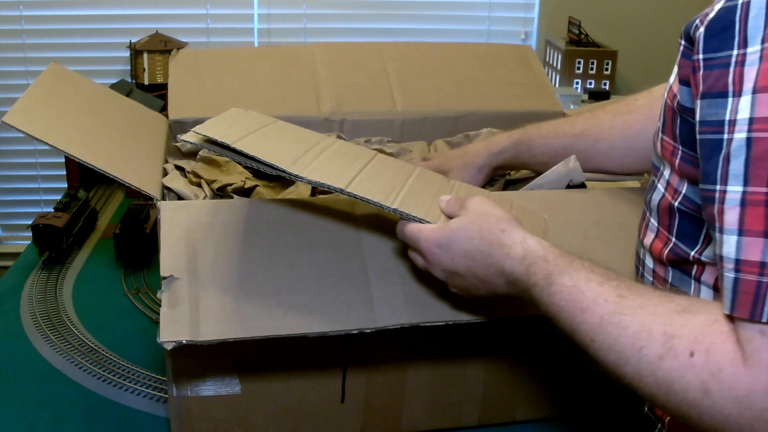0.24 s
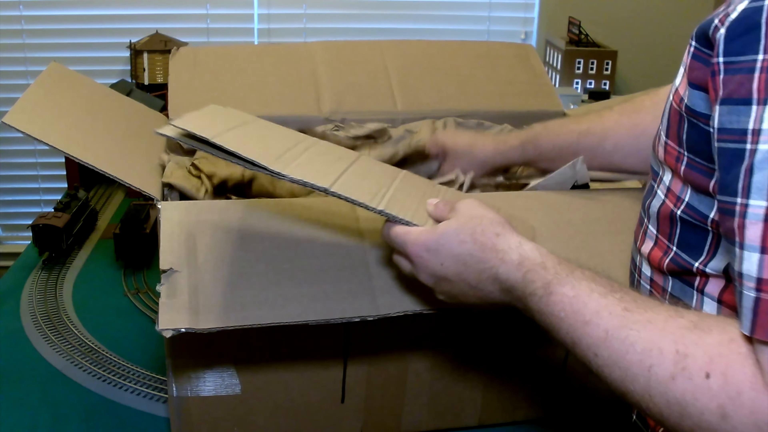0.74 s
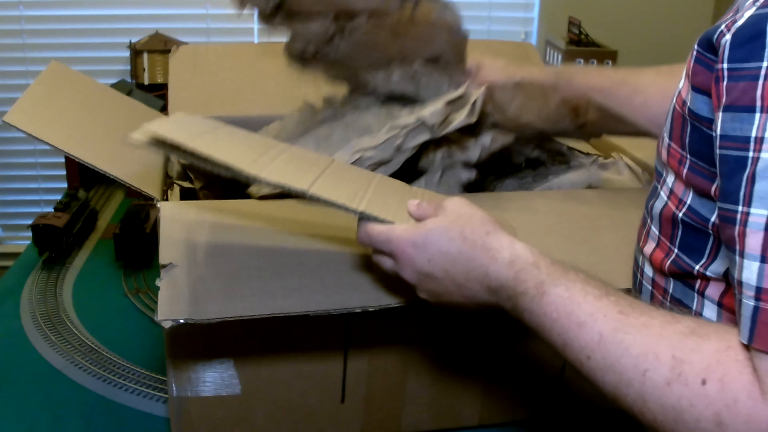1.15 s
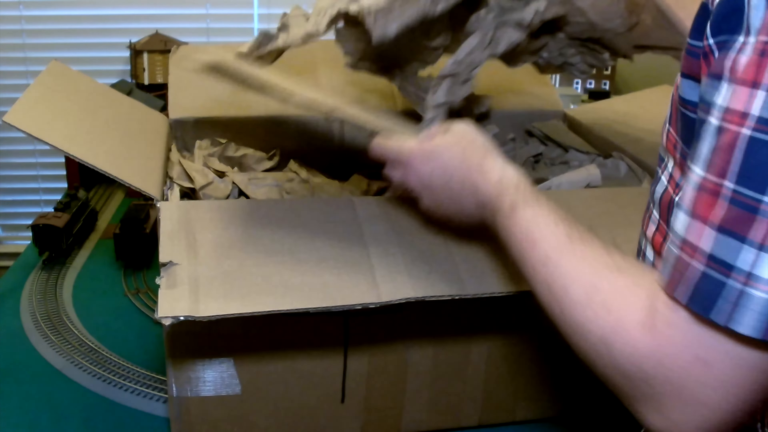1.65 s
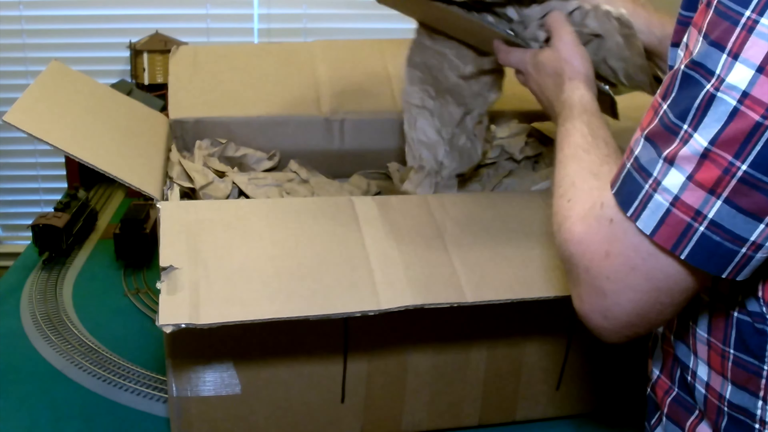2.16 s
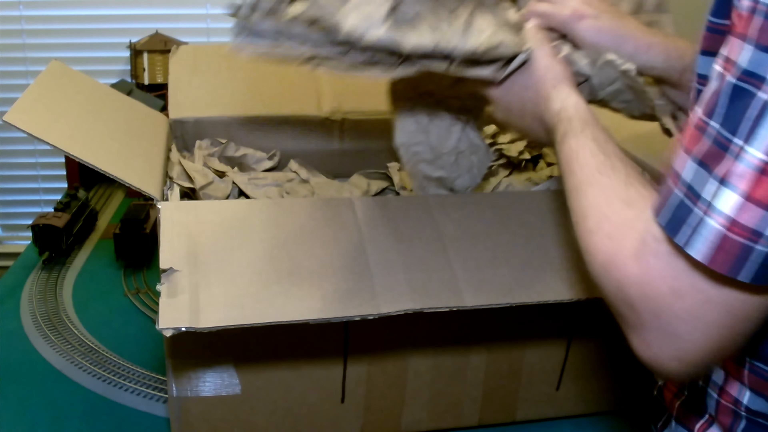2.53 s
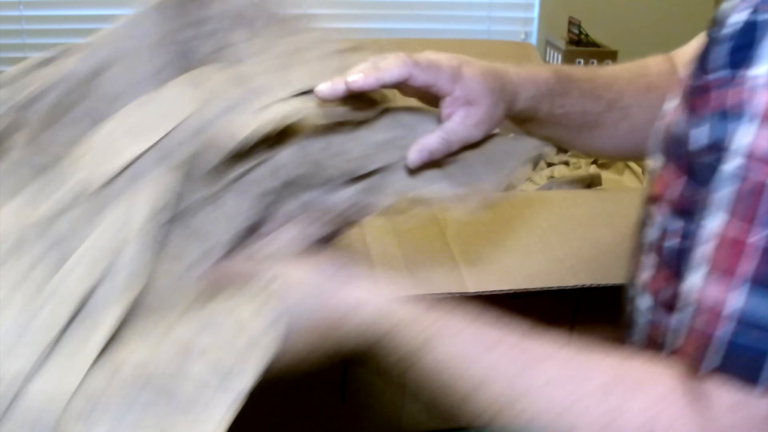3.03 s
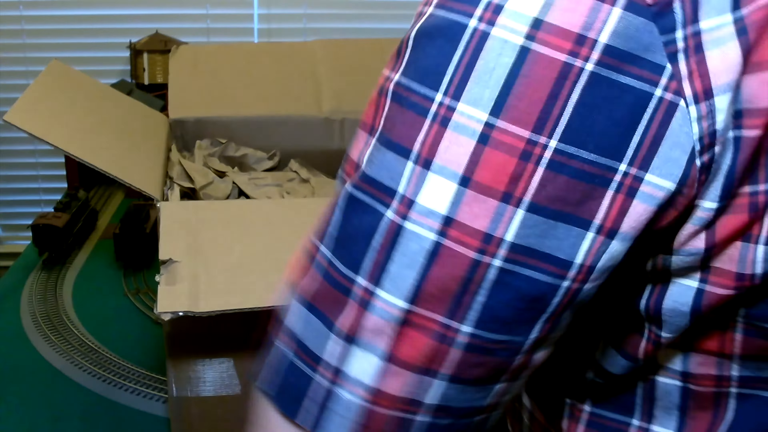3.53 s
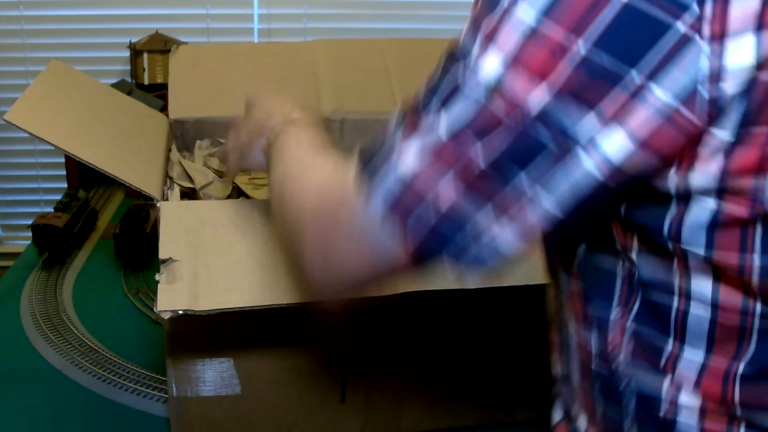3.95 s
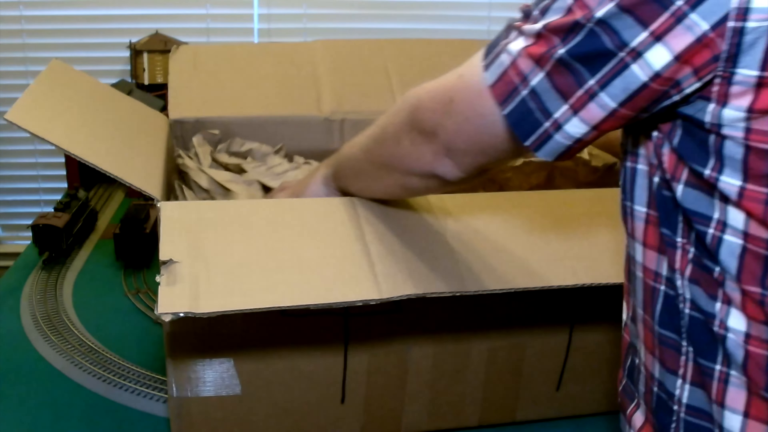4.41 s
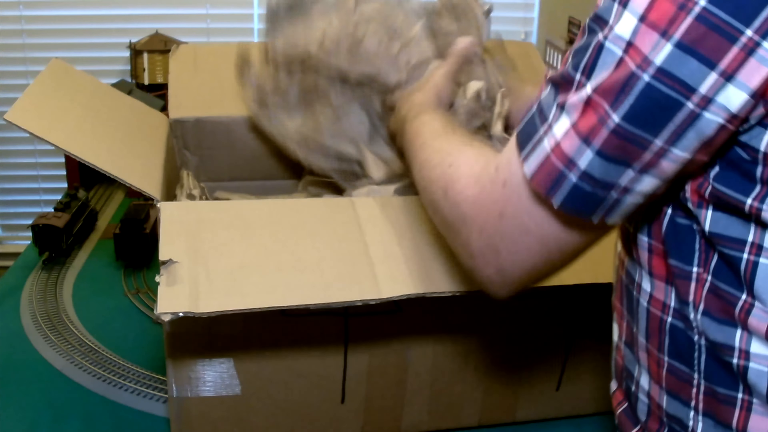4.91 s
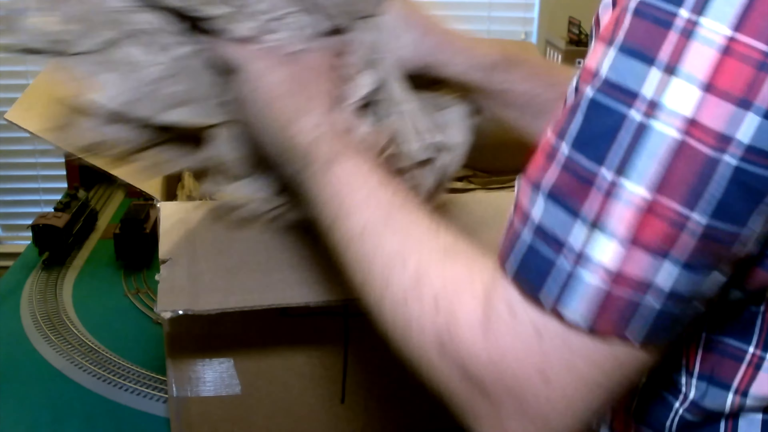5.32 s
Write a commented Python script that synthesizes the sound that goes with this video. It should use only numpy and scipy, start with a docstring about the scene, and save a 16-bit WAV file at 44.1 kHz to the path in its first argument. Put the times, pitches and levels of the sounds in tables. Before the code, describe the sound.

Close, dry crinkling of stiff packing paper fills a quiet little room as hands work it loose from a cardboard box. The rustle softens to a sliding hiss, then builds again with crisp ticks. Just past halfway the box gives a low, soft bump, and soon a taut panel snaps loudly once. Sheets skim past each other, and more paper is pulled out with a fuller crunch.

```python
"""A small quiet room, where hands pull stiff brown packing paper out of a cardboard box.
Thousands of creases buckle as the wad moves, over the hiss of sheets rubbing and skimming;
the larger creases tick and crack on their own. The wad bumps the box walls into a soft boom
on its way out, a taut panel snaps once as it is pushed aside, and a second wad follows."""
import sys
import numpy as np
from scipy import signal
from scipy.fft import rfft, irfft, next_fast_len
from scipy.io import wavfile
from scipy.ndimage import uniform_filter1d

SR = 44100
rng = np.random.default_rng(int(sys.argv[2]) if len(sys.argv) > 2 else 0)


def generate_wav(signal):
    """Clip the signal to [-1, 1] and save it as 16-bit WAV at the path in sys.argv[1]."""
    frames = np.transpose(np.atleast_2d(signal))
    scaled = np.clip(frames, -1, 1) * 32767
    pcm = np.round(scaled).astype(np.int16)
    wavfile.write(sys.argv[1], SR, pcm)


N = 245725
T = np.arange(N) / SR
FFT_SIZE = next_fast_len(N, True)
HZ = np.fft.rfftfreq(FFT_SIZE, 1 / SR)
TOP_HZ = 14750


def amp(db):
    """Decibels to gain."""
    return 10 ** (np.asarray(db) / 20)


def unit_rms(x):
    """Scales to rms 1."""
    return x / np.sqrt(np.mean(x ** 2) + 1e-20)


def steadied(x, span_s=.079):
    """Rides the gain to rms 1: the hands feed in energy steadily, however the creases share it."""
    return x / np.sqrt(abs(uniform_filter1d(x ** 2, int(span_s * SR))) + 1e-12)


def over_pitch(points, hz):
    """Joins breakpoints on a log-frequency axis."""
    point_hz, value = np.transpose(points)
    return np.interp(np.log(hz + 1), np.log(point_hz + 1), value)


def over_time(points):
    """Joins breakpoints into one automation curve per column."""
    times, *columns = np.transpose(points)
    return [np.interp(T, times, column) for column in columns]


def add(mix, start_s, sound):
    """Mixes a sound in at start_s."""
    part = mix[round(start_s * SR):][:len(sound)]
    part += sound[:len(part)]


def eq(x, gain):
    """Filters by a gain for every frequency."""
    return irfft(rfft(x, FFT_SIZE) * gain, FFT_SIZE)[:N]


def band(x, low_hz, high_hz, order=2):
    """Band-pass."""
    return signal.sosfilt(signal.butter(order, [low_hz, high_hz], "band", fs=SR, output="sos"), x)


def room_tone(level_db=-87, corner_hz=150):
    """The faint low hush of the room."""
    return amp(level_db) * unit_rms(eq(rng.standard_normal(N), 1 / np.hypot(1, HZ / corner_hz)))


# Pulls and pushes of the hands. Each row: start, build-up and length in seconds, effort in dB,
# then sliding and fine crinkling in dB relative to the effort.
STROKES = [(-0.042, .04, .22, -35.3, -4.5, -7.5), (0.155, .06, .07, -30.7, -6.3, -7.5),
           (0.265, .1, .175, -30.5, -8, -7), (0.42, .06, .14, -31, -4, -7),
           (0.467, .008, .02, -30, -15, -16), (0.6, .07, .3, -33.6, -7.2, -8),
           (0.94, .08, .36, -40.3, -6.4, -3.8), (1.25, .006, .012, -39.5, -16, -19),
           (1.324, .057, .14, -43.3, -4.5, -3), (1.5, .1, .15, -43.3, -6, -3.7),
           (1.797, .006, .06, -41.5, -7, -4.5), (1.881, .07, .07, -33.5, -5.5, -1),
           (1.993, .05, .1, -36.5, -6, -5.5), (2.11, .03, .09, -36, -5.5, -7.5),
           (2.212, .035, .097, -33.3, -4.2, -3), (2.387, .04, .152, -32.8, -7.7, -3),
           (2.555, .04, .35, -34.3, -6, -4.8), (2.908, .015, .048, -30, -7, -4.5),
           (2.985, .1, .125, -31.5, -7.5, -4.5), (3.19, .035, .09, -34.8, -8, -9.5),
           (3.379, .003, .006, -38, -6, -11), (3.425, .035, .107, -31.3, -3.3, -9.2),
           (3.688, .06, .1, -26.5, -2, -15), (3.79, .04, .12, -37, -1.5, -3.5),
           (4.02, .085, .2, -31, -3, -7.5), (4.159, .006, .012, -35, -19, -1.5),
           (4.223, .16, .52, -29.3, -5.2, -7.7), (4.7, .09, .2, -28, -6, -5.5),
           (4.778, .01, .025, -30, -17, -14), (4.955, .08, .25, -30, -6.5, -6),
           (5.2, .06, .245, -27, -8, -3.5)]
# How fast the sound dies away after a stroke, in dB per second: crunch, sliding, fine crinkling.
SETTLE_DB_PER_S = [72, 65, 102]


def handling():
    """Effort, sliding and crinkling in dB: each stroke builds, holds, and dies away."""
    power, settle = np.zeros((3, N)), np.array(SETTLE_DB_PER_S)[:, None]
    for start, build_s, length, effort_db, slide_db, crinkle_db in STROKES:
        near = slice(max(int(start * SR), 0), int((start + length + 1) * SR))
        t = T[near] - start
        held_db = effort_db + np.array([[0], [slide_db], [crinkle_db]])
        attack = np.clip(t / build_s, 0, 1)
        power[:, near] += (attack * amp(held_db - settle * np.maximum(t - length, 0))) ** 2
    return 10 * np.log10(power + 1e-12)


def crease(pushes, hz, q):
    """A patch of paper rings for a few cycles; filtered twice, the ring swells in softly."""
    b, a = signal.iirpeak(min(hz, 15000), max(q, .8), fs=SR)
    return signal.lfilter(b, a, signal.lfilter(b, a, pushes + 1e-18) + 1e-18)


def buckles(effort_db, spread_db=2.5, clump_db=1.54, clump_hz=40, run_s=.0007, count=900):
    """Creases of every size pop in clumps, more with more effort; each pop is a short run of slips."""
    flutter = eq(rng.standard_normal(N), 1 / (1 + (HZ / clump_hz) ** 4))
    clumps = np.minimum(unit_rms(flutter), 2)
    work = np.cumsum(amp(.66 * effort_db))
    lag, out = np.arange(SR // 300), np.zeros(N)
    for hz in np.geomspace(60, 13000, num=36):
        at = np.searchsorted(work, rng.random(count) * work[-1])
        # wide panels and the tiniest creases differ least in size
        uneven = hz / (hz + 250) / (1 + (hz / 14000) ** 2)
        size_db = uneven * spread_db * np.minimum(rng.exponential(1, count), 4)
        size = amp(size_db + clump_db * clumps[at])
        slips = size[:, None] * rng.standard_normal((count, len(lag))) * np.exp(-lag / SR / run_s)
        pushes = np.bincount((at[:, None] + lag).ravel(), slips.ravel(), N)[:N]
        out += crease(pushes, hz, q=1.7)
    return out


# The room's decay. Each row: frequency in Hz, seconds to fall 60 dB.
ROOM_DECAY = [(150, 0.31), (1000, 0.74), (4000, 1), (12000, 0.31)]


def reflections(first_s=.0013, density=.1):
    """Dense echoes from box flaps and near walls, each band dying at its own speed."""
    t = T[:SR // 2]
    taps = rng.standard_normal(len(t)) * (rng.random(len(t)) < density) * (t > first_s)
    hz, times, spectrum = signal.stft(taps, SR, nperseg=256)
    decay = amp(-60 * times / over_pitch(ROOM_DECAY, hz)[:, None])
    echoes = signal.istft(spectrum * decay, SR, nperseg=256)[1]
    return echoes / np.linalg.norm(echoes)


def reverb(x, spots=8):
    """The sound leaves the wad now here, now there; each spot has its own reflections."""
    spot = np.repeat(rng.integers(0, spots, N // 256 + 1), 256)[:N]
    sends = [np.sqrt(abs(uniform_filter1d(1. * (spot == k), 128))) for k in range(spots)]
    return sum(signal.oaconvolve(x * send, reflections())[:N] for send in sends)


def rubbing(slide_db, crinkle_db, sheen_db=22):
    """Sheets rub with a smooth, airy hiss that takes over when they slide rather than crinkle."""
    hiss = eq(rng.standard_normal(N), amp(sheen_db * np.minimum(HZ / TOP_HZ, 1) ** 4))
    return hiss * amp(-13 + 2.5 * np.clip(slide_db - crinkle_db, 0, 12))


def pockets(x, depth_db=1.22, span_s=.07, span_hz=600):
    """Pockets between the sheets open and close, so their resonances come and go."""
    hz, times, spectrum = signal.stft(x, SR, nperseg=512)
    patches = rng.standard_normal(spectrum.shape)
    for axis, span in enumerate([span_hz / hz[1], span_s / times[1]]):
        patches = uniform_filter1d(patches, max(round(span), 1), axis)
    return signal.istft(spectrum * amp(depth_db * unit_rms(patches)), SR, nperseg=512)[1][:N]


# The voice of the paper in the box. Each row: frequency in Hz, gain in dB.
PAPER_TONE = [(30, -31), (90, -26), (140, -17.5), (230, -10), (480, 0.5), (700, 4.5), (1300, 7),
              (2500, 0.5), (3500, -3.5), (5000, -6), (8500, -7.5), (11200, -11), (12800, -22), (15000, -45)]
# Resonances of the open box. Each row: centre in Hz, width in Hz, gain in dB.
BOX_HOLLOW = [(750, 220, 0.1), (1417, 210, 3), (1700, 950, -4.4), (3400, 590, -0.35), (4330, 870, -2.5),
              (8000, 1800, 4)]
# The wad rising out of the box. Each row: time in seconds, lift from 0 (inside) to 1 (clear).
WAD_LIFT = [(0, 0), (1.3, 0), (2.1, 1), (3.1, 0.7), (3.5, 0.76), (4.9, 0.03), (5.3, 0.9)]


def paper_in_box(x, direct_db=-6, direct_hz=2800, width_hz=1900):
    """Paper and box colour the rustle; lifted clear of the walls, its crunch comes through directly."""
    hollow_db = sum(db / (1 + (2 * (HZ - hz) / width) ** 2) for hz, width, db in BOX_HOLLOW)
    boxed = eq(x, amp(over_pitch(PAPER_TONE, HZ) + hollow_db))
    direct = eq(boxed, amp(direct_db) / (1 + (2 * (HZ - direct_hz) / width_hz) ** 4))
    lift, = over_time(WAD_LIFT)
    return boxed + lift * direct


# Whole panels flexing, most as the wad drags on the box. Each row: time in seconds,
# then wide panels and narrow panels in dB relative to the effort.
PANEL_FLEX = [(0, -19.5, -10), (.7, -26, -15), (1.02, -17, -11.5), (1.42, -16, -12), (1.55, -23, -14),
              (2.1, -29.5, -15), (2.35, -25, -13), (2.65, -30, -15), (3.2, -16.5, -11.5),
              (3.6, -29.5, -15.5), (3.73, -13.5, -10.5), (3.85, -21, -13), (4.07, -22, -11.5),
              (4.2, -17.5, -14.5), (4.8, -19, -11.5), (5.1, -21.5, -9), (5.57, -21, -16)]
# Crossovers in Hz between five registers: wide panels, narrow panels, crunch, sliding, crinkling.
CROSSOVERS_HZ = [350, 680, 3200, 6000]


def rustle(effort_db, slide_db, crinkle_db, wet_db=-1):
    """Buckling creases over rubbing sheets; the handling rides a fader on each register."""
    pops = steadied(buckles(effort_db))
    hiss = rubbing(slide_db, crinkle_db)
    paper = paper_in_box(pockets(pops + amp(wet_db) * reverb(pops) + hiss))
    lowpasses = [1 / (1 + (HZ / hz) ** 10) for hz in CROSSOVERS_HZ]
    registers = np.diff(lowpasses, axis=0, prepend=0, append=1)
    wide_db, narrow_db = over_time(PANEL_FLEX)
    faders_db = [effort_db + wide_db, effort_db + narrow_db, effort_db, slide_db, crinkle_db]
    return sum(steadied(eq(paper, register)) * amp(db) for register, db in zip(registers, faders_db))


def ticks(crinkle_db, per_s=7, above_db=3, spread_db=2, centre_hz=7800, octaves=.3, count=200):
    """Lesser creases tick at random, riding above the crinkling; gives rows like those of CRACKS."""
    when, chance = rng.random((count, 2)).T
    level_scatter, pitch_scatter = rng.standard_normal((count, 2)).T
    at = (when * N).astype(int)
    db = crinkle_db[at] + above_db + spread_db * level_scatter
    hz = centre_hz * 2 ** (octaves * pitch_scatter)
    return np.transpose([T[at], db, hz])[chance < per_s * T[-1] / count]


# The larger creases giving way, and at 3.035 s a knock on a cardboard flap. Each row: start in seconds, level
# in dB, ring in Hz.
CRACKS = [(0.0478, -23, 9040), (0.1095, -23, 7800), (0.1801, -21, 7740), (0.1915, -14.5, 8850),
          (0.2218, -12.5, 1500), (0.2537, -20, 6190), (0.3504, -21, 8000), (0.3852, -21, 7800),
          (0.4754, -15.5, 850), (0.5733, -17.5, 8350), (0.6593, -22, 7200), (0.7372, -17.5, 1620),
          (0.7631, -16.5, 8800), (0.807, -20, 1310), (0.8662, -19.5, 8600), (1.0202, -16.5, 1350),
          (1.0309, -26, 6400), (1.0534, -19, 3400), (1.0536, -24, 600), (1.107, -22, 7450),
          (1.1671, -22.5, 1500), (1.211, -23, 1800), (1.2612, -19.5, 1260), (1.5887, -29, 7360),
          (1.6017, -30, 7500), (1.6483, -31, 820), (1.6835, -36, 1460), (1.9861, -23, 7700),
          (2.0575, -16.5, 7200), (2.1245, -24, 7500), (2.1815, -18.5, 2660), (2.1947, -18, 1410),
          (2.2201, -11.5, 7300), (2.252, -13, 8800), (2.284, -15.5, 8600), (2.292, -16, 7600),
          (2.4353, -18, 1180), (2.4807, -16.5, 2020), (2.495, -16, 1500), (2.5091, -19, 8300),
          (2.5523, -17, 7060), (2.5832, -13.5, 8200), (2.5986, -13.5, 8300), (2.653, -19, 7500),
          (2.7317, -19, 7700), (2.7505, -17, 1700), (2.7512, -14, 6160), (2.7954, -15.5, 7500),
          (2.8177, -20, 6200), (2.8586, -17, 8400), (2.8595, -20, 2000), (2.8923, -16, 7200),
          (2.9203, -13.5, 2360), (2.9413, -11.8, 7200), (2.952, -15, 7000), (2.9977, -17, 7260),
          (3.007, -16.5, 3300), (3.035, -25, 370), (3.061, -18, 1300), (3.096, -18, 1110),
          (3.152, -23, 7200), (3.2215, -23, 1340), (3.2963, -23, 1640), (3.3812, -20, 1700),
          (3.385, -21.5, 5400), (3.3988, -27, 1460), (3.4555, -18.5, 6500), (3.461, -21, 8500),
          (3.5492, -21, 1460), (3.7402, -8, 3070), (3.773, -12, 1100), (3.9515, -17, 3900),
          (4.0095, -24, 1500), (4.0445, -22, 1210), (4.1023, -15, 1340), (4.169, -13, 4030),
          (4.22, -16, 2100), (4.5636, -14, 1400), (4.564, -17, 7000), (4.7942, -10.5, 1300),
          (4.9894, -18, 1120), (5.0705, -19, 7500), (5.107, -13, 1080), (5.148, -21, 8870),
          (5.1587, -17, 1380), (5.2375, -15, 7750), (5.269, -13, 9460), (5.423, -15, 6400),
          (5.4715, -14, 2000), (5.478, -14, 7690)]


def cracks(tick_rows, follow_db=-3, edge_db=-8, edge_hz=7500, edge_s=.0028, wet_db=-6):
    """A crease flips with a bright edge and slips run on along the fold; small folds ring more cycles."""
    t, out = T[:SR // 30], np.zeros(N)
    for start, db, hz in [*CRACKS, *tick_rows]:
        run_s = .0015 * (hz / 1000) ** -.16  # shorter in smaller, higher folds
        slips = (t == 0) + amp(follow_db) * rng.standard_normal(len(t)) * np.exp(-t / run_s)
        body = crease(slips, hz, q=1 + hz / 3800)
        edge = crease(slips * np.exp(-t / edge_s), edge_hz, q=1 + edge_hz / 3800)
        crack = unit_rms(body) + amp(edge_db) * unit_rms(edge)
        energy = amp(db) ** 2 * run_s * SR / 4  # that of a sine dying in run_s
        add(out, start, crack * np.sqrt(energy) / np.linalg.norm(crack))
    return band(out + amp(wet_db) * reverb(out), 300, 12000, order=4)


def ring(hz, db, t60, t):
    """One struck mode dying away."""
    return amp(db - 60 * t / t60) * np.sin(2 * np.pi * hz * t)


# Modes of the box walls. Each row: pitch in Hz, level in dB, seconds to fall 60 dB.
BOX_MODES = [(31.8, -23, 0.66), (59, -13, 0.36), (122.7, -12.5, 0.4), (140, 2.5, 0.089), (188, -24, .08)]
# Soft knocks on the cardboard. Each row: start in seconds, gain in dB.
BUMPS = [(0.931, -49), (0.975, -51), (3.056, -30), (3.089, -34), (3.732, -44), (5.43, -48)]


def bumps(rise_s=.0037):
    """The box walls boom softly when the wad knocks them."""
    t, out = T[:SR // 2], np.zeros(N)
    boom = sum(ring(*mode, t) for mode in BOX_MODES) * (1 - np.exp(-t / rise_s))
    for start, db in BUMPS:
        add(out, start, amp(db) * boom)
    return out


# Sheets skimming each other or the cardboard. Each row: start and length in seconds, level in dB,
# top pitch in Hz, airy top in dB relative to the hiss.
SWISHES = [(0.946, 0.54, -46, 4240, -22), (3.437, 0.14, -37, 4300, -10), (3.78, 0.135, -31, 4300, -19),
           (4.065, 0.12, -32, 3790, -19), (4.151, .035, -33, 4100, -20)]


def swishes(width_hz=2000, sag=.15, airy_hz=12000):
    """A flat sheet skims past: a band of hiss that rises and swells with its speed, and an airy top."""
    t, out = T[:SR // 2], np.zeros(N)
    for start, length, db, hz, airy_db in SWISHES:
        noise = rng.standard_normal((3, len(t)))
        speed = np.sin(np.pi * np.minimum(t / length, 1))
        phase = 2 * np.pi * np.cumsum(hz * (1 - sag * (1 - speed))) / SR
        hiss = band(noise[0], 22, width_hz / 2) * np.cos(phase)
        hiss += band(noise[1], 30, width_hz / 2) * np.sin(phase)
        airy = crease(noise[2], airy_hz, q=4.8)
        add(out, start, amp(db) * speed * (unit_rms(hiss) + amp(airy_db) * unit_rms(airy)))
    return out


# Modes of the taut sheet. Each row: pitch in Hz, level in dB, seconds to fall 60 dB, delay in seconds.
SHEET_MODES = [(294, -16, 0.06, 0.0008), (734, -9, 0.047, 0), (1244, -5, 0.067, 0.0011),
               (1520, 11, 0.0062, 0), (3080, 6.5, 0.0086, 0.0034), (4660, -7, 0.032, 0.0021)]


def snap(start=3.7327, gain_db=-7, rise_s=.00009, burst_s=.0081, push_db=-34, push_s=.0075, wet_db=-14):
    """A wide panel pops through: a burst, the knock and ring of the sheet, and a low push of air."""
    t, out = T[:SR // 5], np.zeros(N)
    attack = amp(gain_db) * (1 - np.exp(-t / rise_s))
    burst = amp(-3) * unit_rms(band(rng.standard_normal(len(t)), 520, 4800)) * np.exp(-t / burst_s)
    add(out, start, attack * burst)
    for *mode, delay in SHEET_MODES:
        add(out, start + delay, attack * ring(*mode, t))
    out = band(out + amp(wet_db) * reverb(out), 206, 10000, order=3)
    add(out, start, amp(push_db) * (1 - t / push_s) * np.exp(-t / push_s))
    return out


def scene():
    """Paper, box and room in one mono mix."""
    effort_db, slide_db, crinkle_db = handling()
    paper = rustle(effort_db, slide_db, crinkle_db) + swishes() + snap() + cracks(ticks(crinkle_db))
    return (paper + bumps() + room_tone())[None]


def record(dry):
    """The microphone overloads softly on the snap; a steep low-pass trims the top."""
    ceiling = .58
    clipped = dry / (1 + (dry / ceiling) ** 6) ** (1 / 6)
    lowpass = signal.firwin(255, TOP_HZ, window=("kaiser", 9), fs=SR)
    return signal.oaconvolve(clipped, lowpass[None], "same")


dry = scene()
out = record(dry)
generate_wav(out)
```